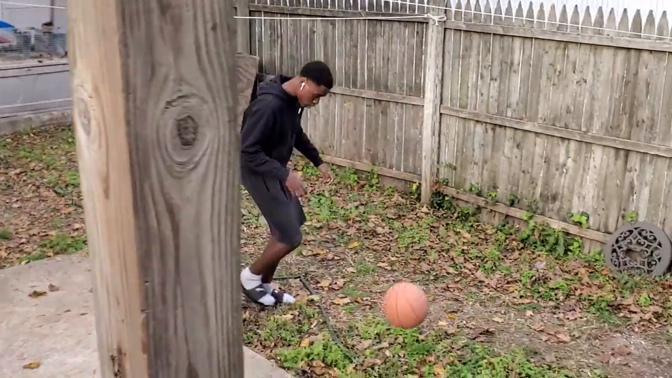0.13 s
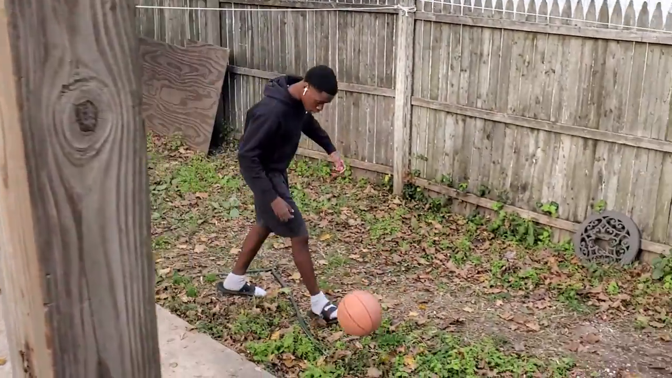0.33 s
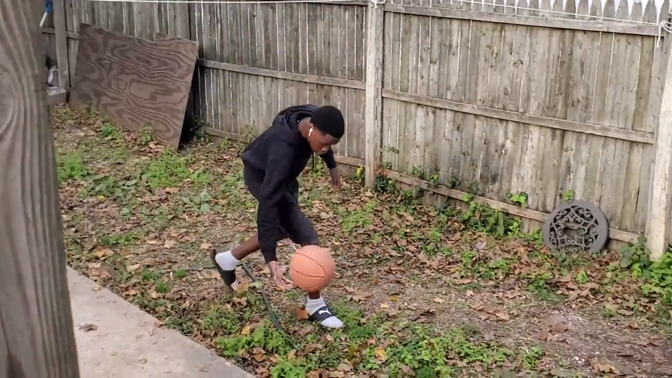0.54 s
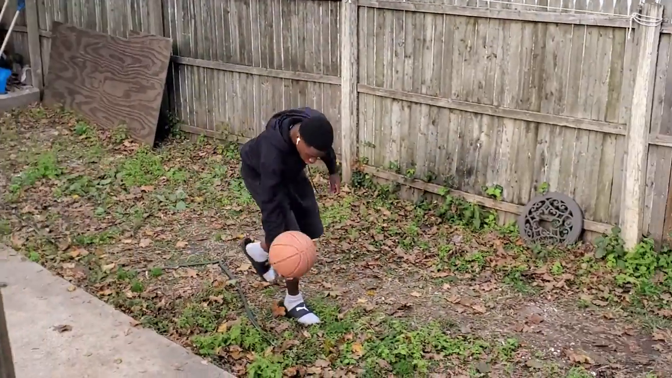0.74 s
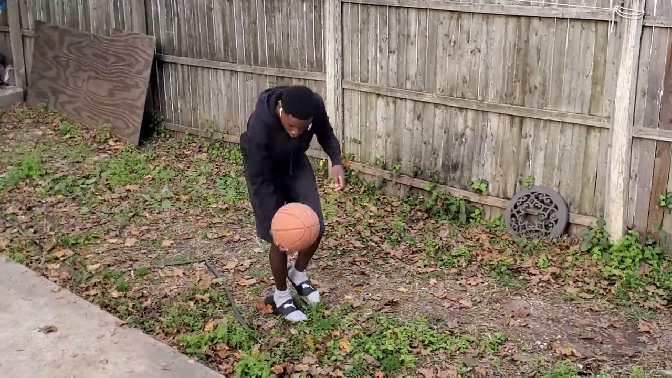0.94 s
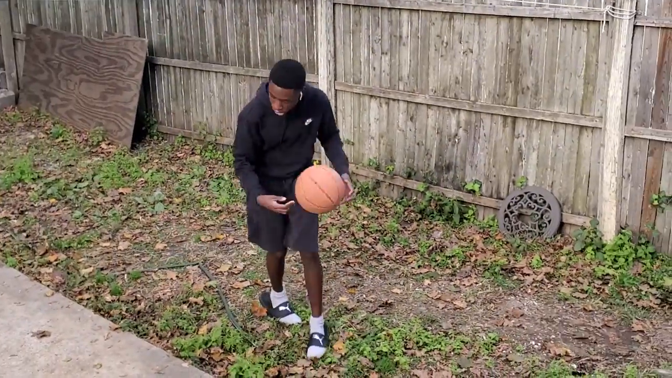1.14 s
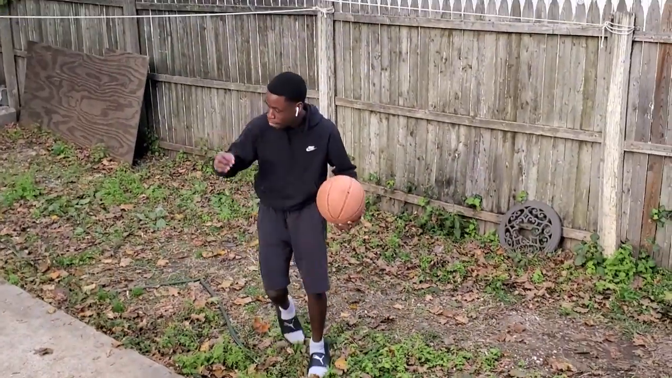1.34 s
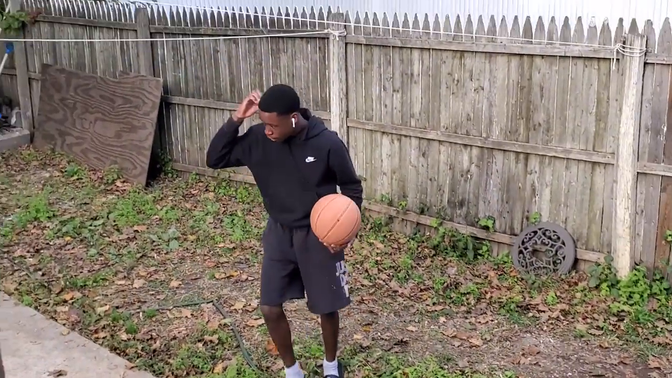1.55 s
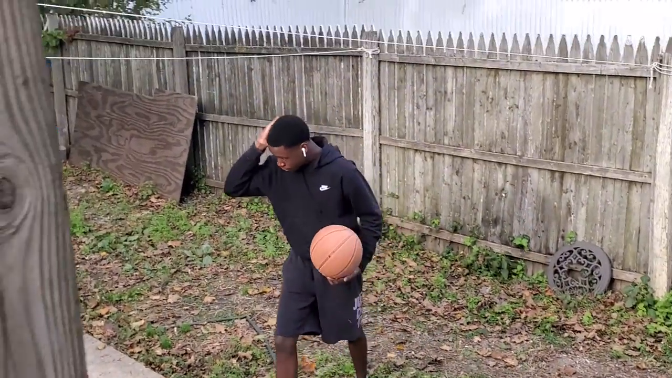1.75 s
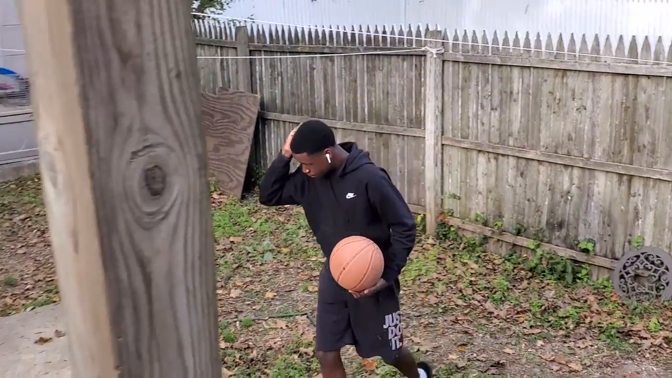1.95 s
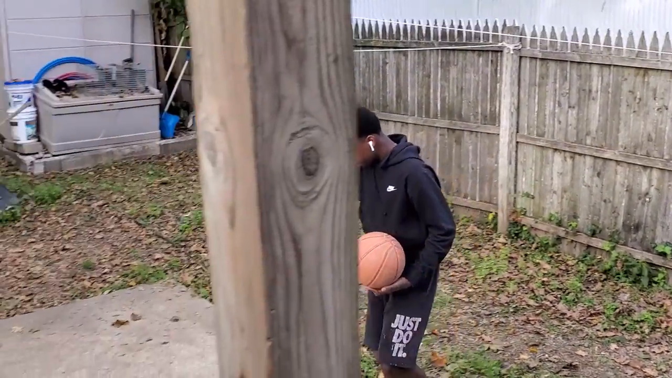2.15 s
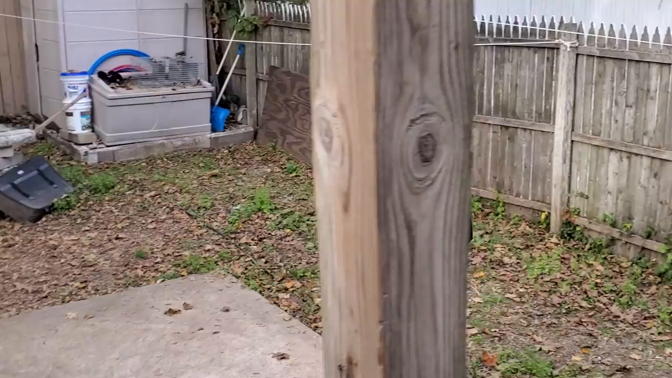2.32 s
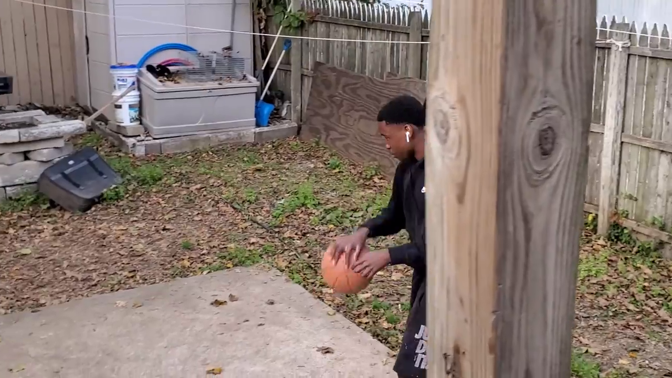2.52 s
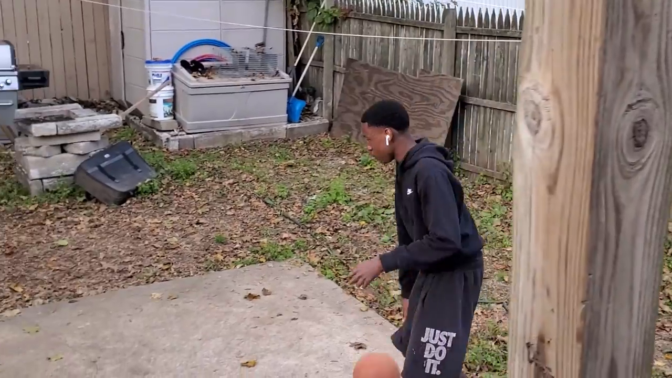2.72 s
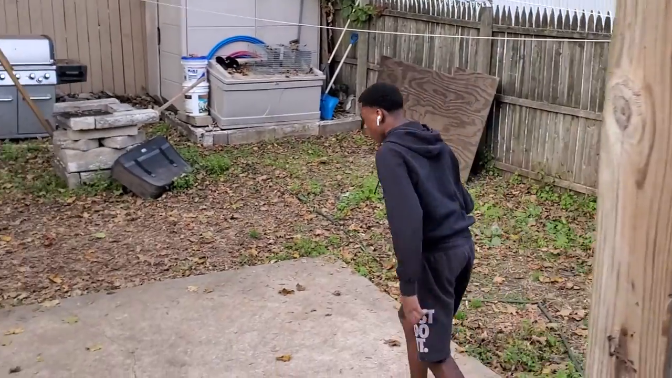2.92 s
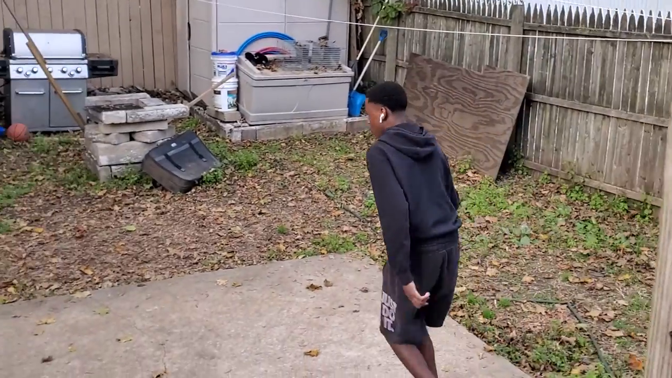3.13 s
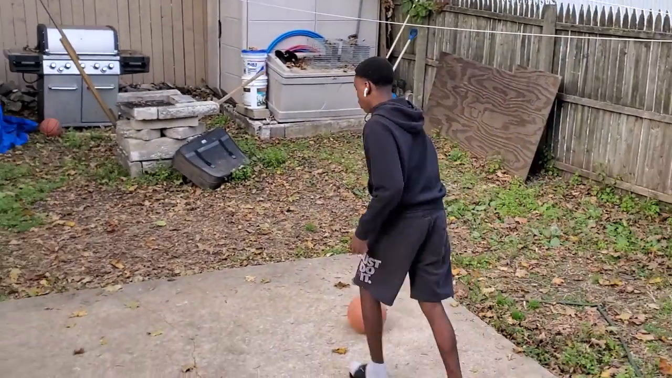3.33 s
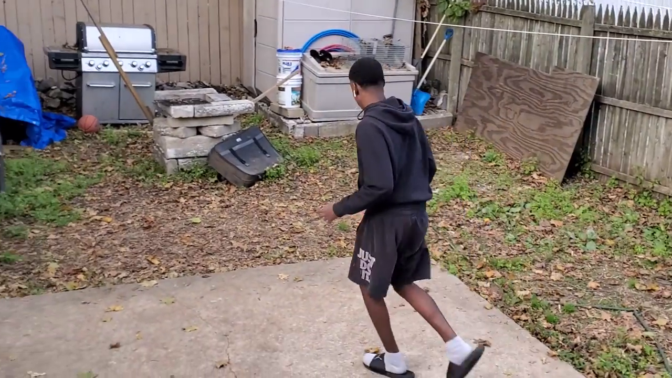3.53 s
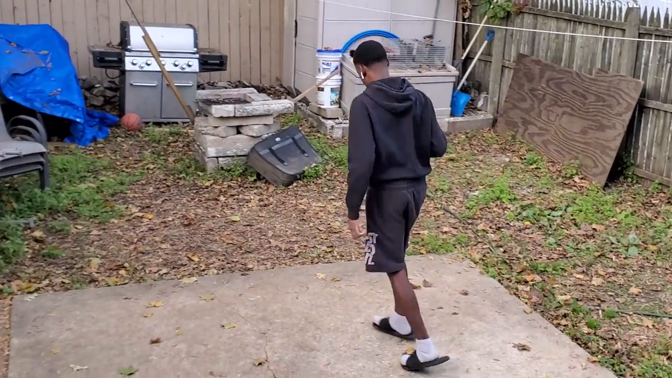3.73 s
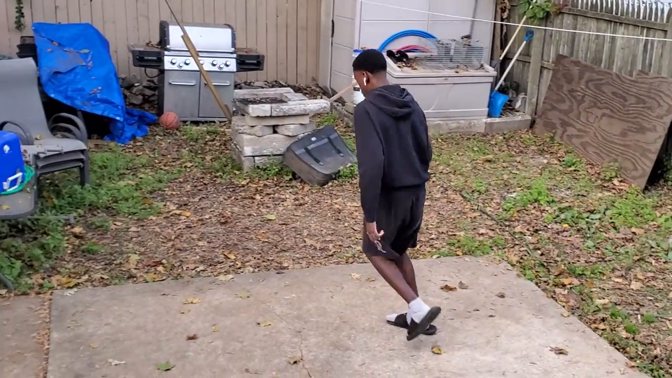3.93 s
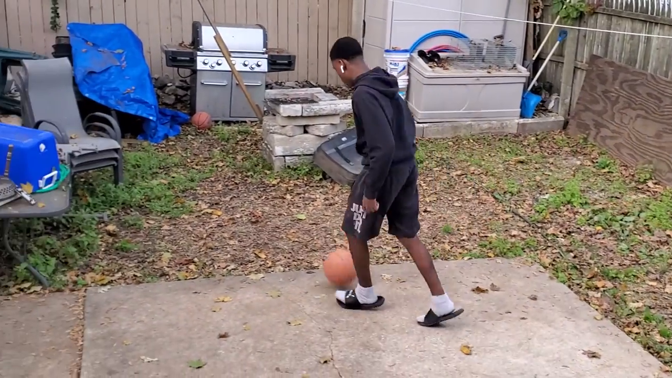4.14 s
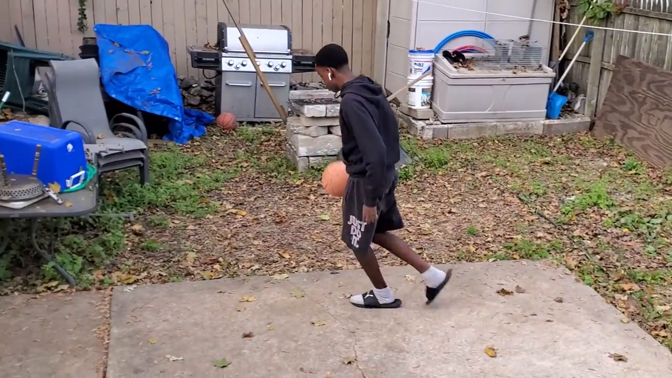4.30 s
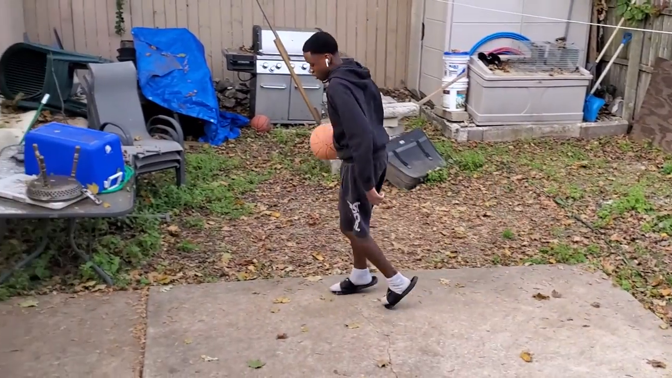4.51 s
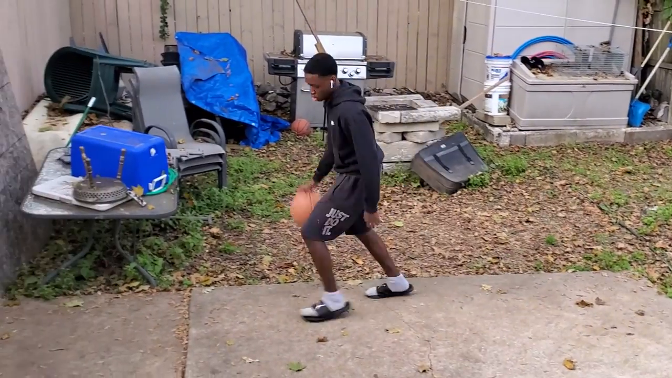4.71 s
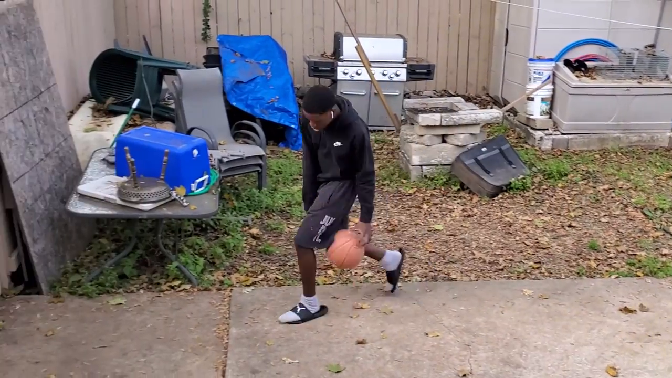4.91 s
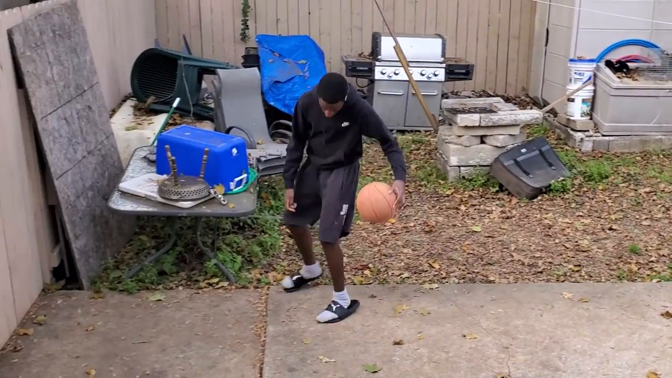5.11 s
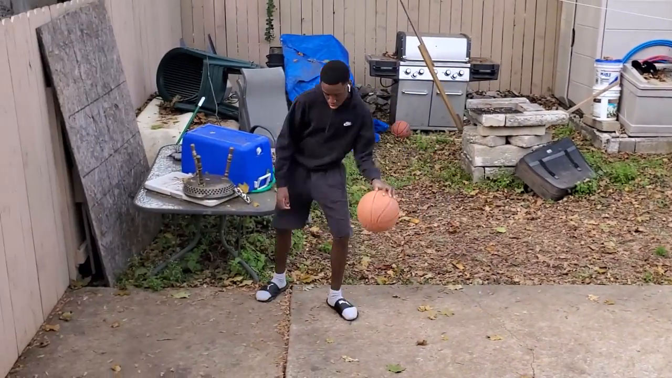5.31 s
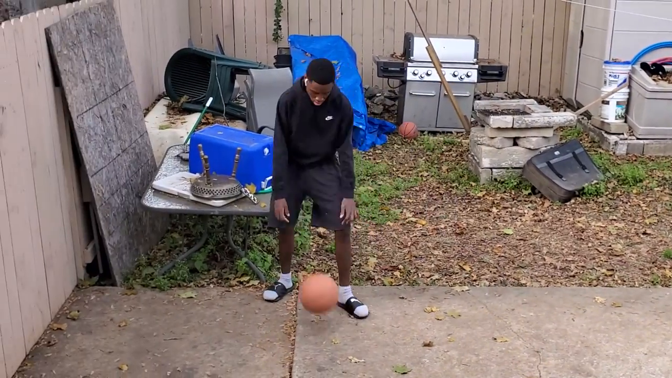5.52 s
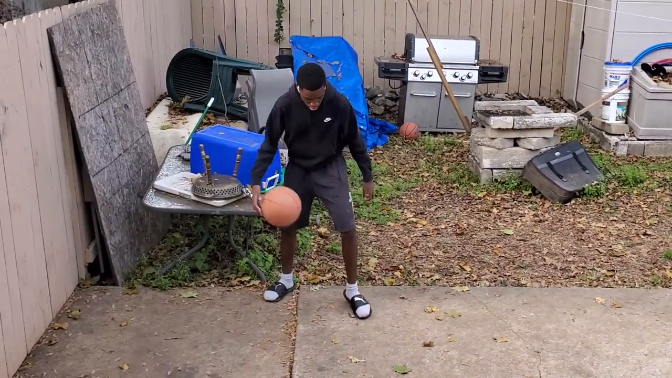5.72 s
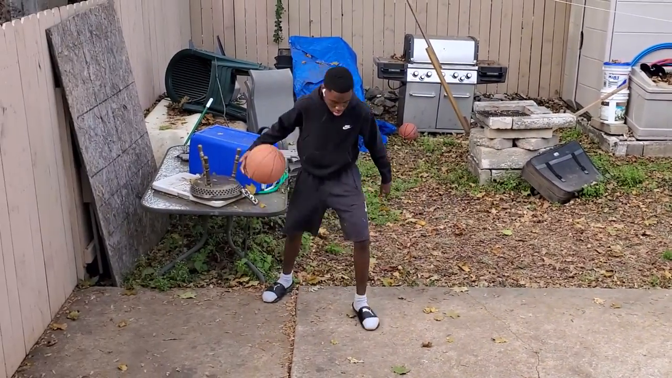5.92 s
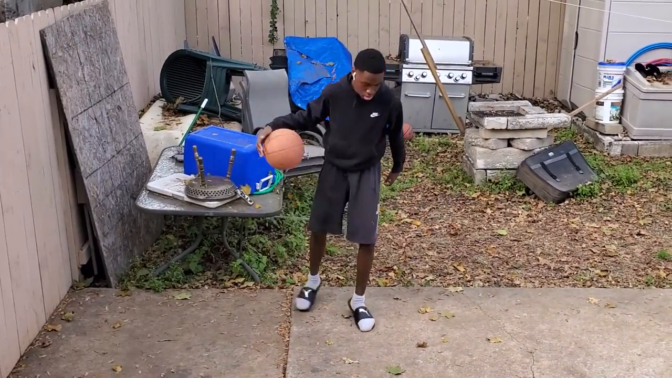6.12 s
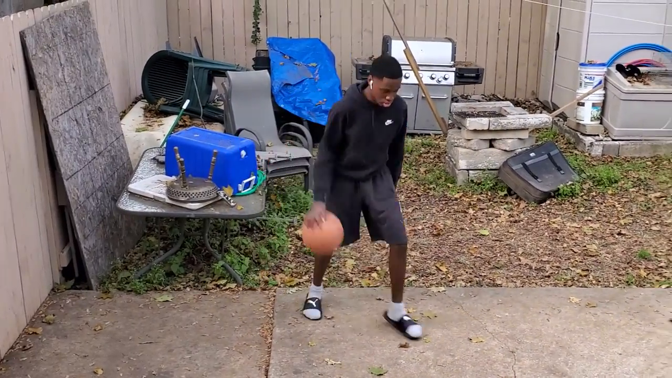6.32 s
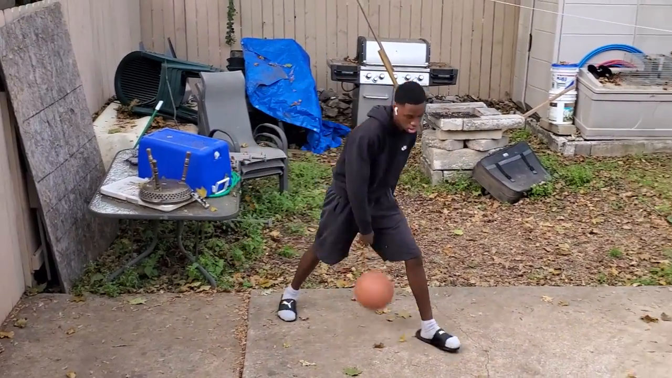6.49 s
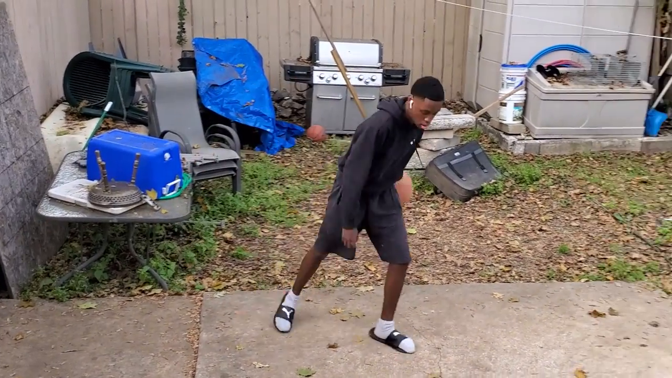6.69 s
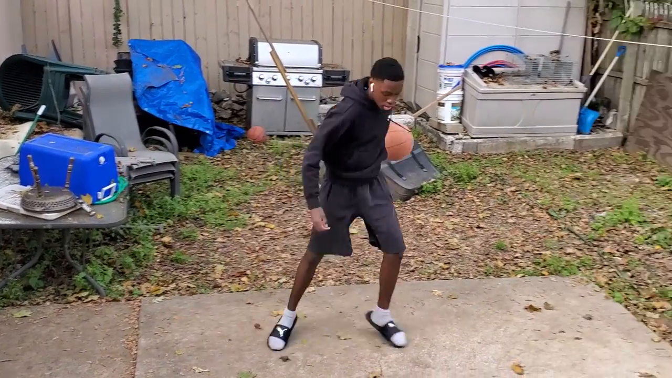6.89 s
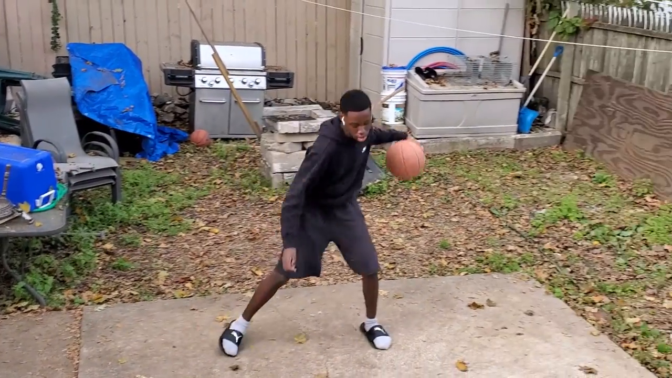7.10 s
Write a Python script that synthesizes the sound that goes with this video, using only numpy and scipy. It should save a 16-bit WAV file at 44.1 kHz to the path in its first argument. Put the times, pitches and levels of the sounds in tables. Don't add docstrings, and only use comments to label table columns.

```python
import sys
import numpy as np
from scipy import signal
from scipy.io import wavfile

SR = 44100
rng = np.random.default_rng(int(sys.argv[2]) if len(sys.argv) > 2 else 0)


def inscribe(sig):
    pcm = np.round(np.clip(np.atleast_2d(sig).T, -1, 1) * 32767)
    wavfile.write(sys.argv[1], SR, pcm.astype(np.int16))


def convert_level_to_amplitude(level_db):
    exponent = np.asarray(level_db, float) / 20
    return 10 ** exponent


N = 315315
TIME = np.arange(N) / SR
PORT_LAG_MS = 0.45
HEARD_S = 0.001
EDGES = 30 * 2 ** np.arange(0, 9.3, 0.5)

# start in seconds, crack peak in dB, push peak in dB,
# air ring relative to the crack in dB, yard tail in dB.
BOUNCES = [
    (0.4189, -28.5, -9, -10.5, -33.5),
    (2.8539, -5, -5.5, -8.5, -20),
    (3.5161, -12.5, -5.5, -4, -19.5),
    (4.2954, -16, -7.5, -0.5, -20.5),
    (4.9727, -9.5, -10, -5.5, -22),
    (5.6685, -18.5, -13, -4, -26),
    (6.6282, -7, -11, -10, -23.5),
]


def at_hz(points, hz):
    point_hz, value = np.array(points).T
    return np.interp(np.log(hz), np.log(point_hz), value)


def drift(rate):
    step = 40
    r = np.exp(-2 * np.pi * step * rate / SR)
    white = rng.standard_normal(N // step + 2002)
    slow = signal.lfilter([1], [1, -2 * r, r * r], white)[2000:]
    return np.interp(np.arange(N) / step, np.arange(len(slow)), slow / np.std(slow))


def ring(clicks, hz, t60):
    r = convert_level_to_amplitude(-60 / (max(t60, 1e-3) * SR))
    w = 2 * np.pi * hz / SR
    return signal.lfilter([0, np.sin(w)], [1, -2 * r * np.cos(w), r * r], clicks + 1e-18)


def strikes(s, size, pan_db, lag_ms):
    out = np.zeros((2, N))
    for side, way in enumerate((0.5, -0.5)):
        at = np.round((s + way * lag_ms / 1000) * SR).astype(int)
        np.add.at(out[side], np.clip(at, 0, N - 1), size * convert_level_to_amplitude(way * pan_db))
    return out


def struck(modes, s, peak_db, pan_db, lag_ms, uneven_db):
    luck = rng.standard_normal((len(s), len(modes)))
    out = 0
    for k, (hz, db, t60) in enumerate(modes):
        size = (-1) ** k * convert_level_to_amplitude(peak_db + db + uneven_db * luck[:, k])
        out = out + ring(strikes(s, size, pan_db, lag_ms), hz, t60)
    return out


def bands(white):
    # frequency in Hz, left-right likeness from 0 to 1.
    likeness = [(60, .99), (130, 1), (290, 0.87), (640, 0.89), (1400, 0.23), (3100, 0.082), (15000, 0.037)]
    # frequency in Hz, left over right in dB.
    side_bias = [(100, -.5), (2000, -1), (4400, -4), (8000, 0), (15000, -2)]
    for k, (low, high) in enumerate(zip(EDGES, EDGES[1:])):
        sos = signal.butter(2, [low, high], "band", fs=SR, output="sos")
        mid, side = signal.sosfilt(sos, white[k % 2])
        hz = min(np.sqrt(low * high), 15200)
        alike = np.clip(at_hz(likeness, hz), -1, 1)
        pair = np.sqrt(1 + alike) * mid + np.sqrt(1 - alike) * side * [[1], [-1]]
        yield hz, pair * convert_level_to_amplitude(at_hz(side_bias, hz) * np.array([[0.5], [-0.5]]))


def density(spectrum, low_hz, high_hz):
    hz = np.linspace(low_hz, high_hz, 400)
    mean_power = np.mean(convert_level_to_amplitude(2 * at_hz(spectrum, hz)))
    return np.sqrt(SR / 4 / (mean_power * (high_hz - low_hz)))


def yard():
    # time in seconds, rumble in dB.
    rumble = [(0.0, -54.5), (0.26, -54), (0.55, -43.5), (1.21, -54.5), (2.69, -52.5), (3.01, -43.5),
              (3.36, -53), (3.62, -50), (4.48, -49.5), (4.8, -45.5), (5.2, -50), (5.85, -49.5),
              (6.13, -44), (6.67, -50.5), (7.15, -45)]
    # frequency in Hz, density in dB per Hz.
    floor_colour = [(15, -35), (25, -13), (48, 8.5), (65, 6), (146, -12), (266, -14.5), (470, -23),
                    (831, -16), (1470, -18), (1780, -29), (2900, -29), (4990, -32), (9330, -35),
                    (15200, -37), (16500, -49)]
    # frequency in Hz, density in dB per Hz.
    tail_colour = [(35, -32), (50, -4.5), (71, 0), (100, -5), (143, -9.5), (200, -13), (285, -20.5),
                   (480, -22.5), (800, -15), (1140, -21), (2300, -30.5), (4600, -33), (9100, -35),
                   (15200, -52.5)]
    # frequency in Hz, t60 in seconds.
    tail_t60 = [(50, 0.43), (130, 0.27), (350, 0.24), (920, 0.29), (2430, 0.39), (6400, 0.26)]
    rumble_db = np.interp(TIME, *np.transpose(rumble))
    hum_db = -58 + 0.13 * (rumble_db - rumble_db.mean())
    air_db = -56
    s, tail_db = np.transpose(BOUNCES)[[0, 4]]
    boom_db = tail_db - 11.5 + 2.5 * np.maximum(s - 2.45, 0)
    blows = strikes(s + 0.0013, convert_level_to_amplitude(2 * tail_db), 0, 0)[0]
    booms = strikes(s + 0.0013, convert_level_to_amplitude(2 * boom_db), 0, 0)[0]
    out, gust = 0, drift(4.5)
    for hz, pair in bands(rng.standard_normal((2, 2, N))):
        fall = convert_level_to_amplitude(-120 / (at_hz(tail_t60, hz) * SR))
        build = np.exp(-1 / ((0.0015 + 1.6 / hz) * SR))
        power = signal.lfilter([1], [1, -fall], (booms if hz < 170 else blows) + 1e-18)
        power = signal.lfilter([(1 - build) ** 2], [1, -2 * build, build ** 2], power)
        tail_gain = convert_level_to_amplitude(at_hz(tail_colour, hz) + 2.8 * drift(25))
        tail = np.sqrt(power) * tail_gain * density(tail_colour, 500, 16000)
        if hz < 110:
            low_hz, high_hz, level_db = 30, 110, rumble_db
        elif hz < 450:
            low_hz, high_hz, level_db = 110, 450, hum_db
        else:
            low_hz, high_hz, level_db = 450, 16000, air_db
        sway_db = 0.27 * gust + (3.2 if hz < 450 else 1.8) * drift(5.6)
        floor = convert_level_to_amplitude(level_db + at_hz(floor_colour, hz) + sway_db) * density(floor_colour, low_hz, high_hz)
        out = out + np.hypot(tail, floor) * pair
    return out


def leaves():
    # start in seconds, peak in dB, low part relative to the peak in dB.
    ticks = [(0.3204, -59.5, 12), (0.7047, -51, -5), (0.7902, -37.5, -13), (0.898, -43, -10),
             (0.9283, -46, -30), (1.057, -46.5, -21), (1.104, -50, -24), (1.1854, -28, -25),
             (1.683, -42.5, -4), (1.82, -39, -27), (2.2708, -43, -14), (2.748, -35.5, -20),
             (2.7543, -36, -16), (3.1204, -29.5, -17), (3.2614, -51, -24), (3.746, -47.5, -8),
             (3.9613, -30, -19), (4.124, -39, -37), (4.13, -40, -35), (4.1846, -46, -37), (4.66, -35, -32),
             (4.929, -29.5, -17), (5.2638, -34, -17), (5.363, -33, -20), (5.8558, -42, -18),
             (5.9213, -44, -18), (6.11, -46, -7), (6.193, -42, -30), (6.769, -52, -11), (6.9216, -22, -27)]
    s, peak_db, low_db = np.transpose(ticks)
    fall, out = convert_level_to_amplitude(-60 / (0.015 * SR)), 0
    for db, low_hz, high_hz in ((peak_db + 0.5, 3800, 16000), (peak_db + low_db + 7.0, 350, 2000)):
        burst = signal.lfilter([1], [1, -fall], strikes(s, convert_level_to_amplitude(db), -1.5, -0.089) + 1e-18)
        sos = signal.butter(2, [low_hz, high_hz], "band", fs=SR, output="sos")
        gain = np.sqrt(SR / 2 / (high_hz - low_hz))
        out = out + gain * signal.sosfilt(sos, burst * rng.standard_normal((2, N)))
    return out


def hums():
    # start in seconds, end in seconds, frequency in Hz, level in dB.
    rubs = [
        (0.118, .30, 1316, -53),
        (0.607, 0.696, 1810, -55.5),
        (0.814, 1.01, 1100, -49),
        (3.838, 3.95, 1800, -62),
        (5.503, 5.68, 1264, -48.5),
        (6.05, 6.19, 1390, -52.5),
        (6.09, 6.17, 2115, -66),
    ]
    out = 0
    for start, end, hz, db in rubs:
        tone = ring(ring(rng.standard_normal(N), hz, 0.03), hz, 0.03)
        tone = tone / np.std(tone[int(start * SR):int(end * SR)])
        swell = np.sin(np.pi * np.clip((TIME - start) / (end - start), 0, 1))
        out = out + convert_level_to_amplitude(db) * tone * swell
    return out


def sole():
    # start in seconds, hiss in dB, fall in dB per second,
    # grit relative to hiss in dB, drag relative to hiss in dB.
    slaps = [(1.183, -46, 215, 4, -5), (1.683, -64.5, 76, 8.5, 4), (2.746, -56.5, 165, 4, -8),
             (3.118, -40.5, 215, 2, -6), (3.431, -36.5, 475, -1, -13.5), (3.961, -37.5, 450, -3, -8),
             (4.123, -62.5, 60, -6, -20), (4.658, -39.5, 260.5, 7.5, -2.5), (5.26, -47.5, 110, 11, -3),
             (6.341, -43, 145, 0.5, 1), (6.572, -48, 100, -4, -16), (6.845, -38, 63, 0.5, -7),
             (7.098, -31, 250, 3.5, -9.5)]
    # centre in seconds, swell in seconds,
    # hiss in dB, grit relative to hiss in dB.
    drags = [(.078, 0.038, -48, 2.5), (.227, 0.09, -55.5, -7.5), (0.399, 0.042, -36.5, -0.5),
             (.5, 0.12, -50, -1), (.6, 0.073, -52, 2.5), (0.658, 0.13, -50, .5), (.82, 0.057, -53.5, -4.5),
             (1.161, .025, -57, 6), (1.32, 0.15, -47, 0), (1.52, 0.029, -54.5, 1.5),
             (1.85, 0.25, -58, -2.5), (2.162, 0.068, -43, -0.5), (2.248, 0.073, -47.5, 0),
             (2.442, 0.069, -34, -2), (2.576, 0.027, -37.5, 2), (2.62, 0.074, -50.5, 0.5),
             (3.372, 0.027, -56, -9), (3.573, 0.055, -40.5, 0.5), (4.05, 0.041, -66, 2.5),
             (4.46, 0.021, -55, -3), (4.881, 0.031, -51.5, -0.5), (4.955, 0.033, -31, 4.5),
             (4.703, 0.038, -43.5, 4.5), (5.384, 0.042, -34, 4), (5.47, 0.045, -54, 4.5),
             (5.66, 0.18, -54.5, 1), (6.15, 0.13, -61, 5.5), (6.616, .03, -40.5, 2),
             (6.75, 0.18, -65.5, 9.5), (7.008, 0.033, -39, -0.5)]
    t = np.arange(0, N + 64, 64) / SR
    shapes = []
    for s, db, fall, grit_db, drag_db in slaps:
        since = t - s - 0.008
        slope = np.where(t < s + 0.008, 1600, -fall)
        shapes.append((db + slope * since, grit_db, drag_db))
    for s, swell, db, grit_db in drags:
        away = np.abs((t - s) / swell / np.where(t > s, 1.254, 1))
        loss_db = 15.5 * away ** 1.53
        shapes.append((db - loss_db, grit_db, -6 + 1.57 * grit_db))
    power = 1e-12
    for db, grit_db, drag_db in shapes:
        power = power + convert_level_to_amplitude(2 * (db + np.array([[0], [grit_db], [drag_db]])))
    return [np.interp(TIME, t, 10 * np.log10(p)) for p in power]


def feet():
    # frequency in Hz, density in dB per Hz.
    scuff_colour = [(400, -16.5), (570, -12), (800, -4.5), (1600, -1.5), (2300, -4.5), (3200, -12),
                    (4600, -7.5), (6500, -11.5), (9100, 2.5), (12900, -0.5), (15200, -15)]
    hiss_db, grit_db, drag_db = sole()
    grain_db = 2.7 * np.minimum(rng.exponential(1, N), 6)
    grains = convert_level_to_amplitude(grain_db + 0.54 * drift(110.0) + 1.48 * drift(18))
    white = rng.standard_normal((2, 2, N)) * grains / np.sqrt(np.mean(grains ** 2))
    out = 0
    for hz, pair in bands(white):
        if hz < 3000:
            low_hz, high_hz, region_db = 600, 3000, drag_db
        elif hz < 8000:
            low_hz, high_hz, region_db = 3000, 8000, grit_db
        else:
            low_hz, high_hz, region_db = 8000, 15500, hiss_db
        level_db = region_db + at_hz(scuff_colour, hz) + 2.8 * drift(22)
        out = out + (hz > 400) * convert_level_to_amplitude(level_db) * density(scuff_colour, low_hz, high_hz) * pair
    return out


def steps():
    # start in seconds, peak in dB, frequency in Hz.
    landings = [
        (0.764, -36, 380),
        (2.55, -33.5, 295),
        (2.57, -38, 71.4),
        (3, -19.5, 65.4),
        (3.958, -35, 540),
        (4.668, -40, 67),
        (7.1, -33, 51.1),
    ]
    out = 0
    for s, db, hz in landings:
        out = out + ring(strikes(np.array([s]), convert_level_to_amplitude(db), -1, -PORT_LAG_MS), hz, 8.4 / hz)
    return out


def ground():
    # frequency in Hz, peak in dB, t60 in seconds.
    notes_of_ground = [
        (456, -27.5, 0.038),
        (1180, -19, .02),
        (749, -27.5, 0.34),
        (903, -21, 0.062),
        (1050, -12.5, 0.039),
        (1324, -16, 0.015),
        (1900, -10, 0.015),
    ]
    out = 0
    for bounce, (hz, db, t60) in zip(BOUNCES, notes_of_ground):
        click = strikes(np.array([bounce[0] + HEARD_S]), convert_level_to_amplitude(db), -0.8, -0.04)
        out = out + ring(click, hz, t60)
    return out


def arrivals():
    # post delay in ms, porch delay in ms,
    # house wall delay in ms, post return in dB, wall return in dB.
    places = [
        (2.6, 13, 20, -13, -30),
        (2.8, 8.1, 18, -5, -8.5),
        (5.5, 19.8, 16.8, 1.5, -13),
        (2.4, 7.5, 21, -8, -25),
        (3.12, 4.8, 25, 3.5, -33),
        (4.9, 6.5, 20.3, -13, -36),
    ]
    # air ring in dB, left over right in dB, left lag in ms.
    surfaces = [
        (-3, 5, -.45),
        (1, 4.5, 0.24),
        (-8, 10, 0.227),
        (-20.5, -1.5, .25),
    ]
    rows = [(0, 2.3 * k, -2 - 0.36 * k, -1.5, 17.5 * (-1) ** k, 0.27 * (-1) ** k) for k in range(1, 8)]
    for k, (post_ms, porch_ms, wall_ms, post_db, wall_db) in enumerate(places):
        paths = (post_ms, post_db), (porch_ms, post_db - 0.5), (wall_ms, wall_db), (37, wall_db - 11.5)
        rows += [(k + 1, *path, *surface) for path, surface in zip(paths, surfaces)]
    return np.transpose(rows)


def push():
    # frequency in Hz, level in dB, t60 in seconds.
    squash = [(75, 4, .056), (185, -6, .06), (245, -7, .05), (385, -13, .045)]
    start_ms = (5.8, 4.8, 4.6, 3.0)
    wall_ms, wall_db = 13.7, -4.5
    s, crack_db, push_db = np.transpose(BOUNCES)[:3]
    luck = rng.standard_normal((len(s), len(squash)))
    hard_db = 0.2 * (crack_db - push_db + 0.5)
    out = 0
    for k, (hz, db, t60) in enumerate(squash):
        size = convert_level_to_amplitude(push_db + db + (k > 0) * (hard_db + 3.7 * luck[:, k]))
        at = np.r_[s, s + wall_ms / 1000] + start_ms[k] / 1000
        clicks = strikes(at, np.r_[size, size * convert_level_to_amplitude(wall_db)], -0.8, -PORT_LAG_MS)
        soft = signal.lfilter([0.0036], [1, -1.88, 0.8836], clicks)
        out = out + ring(soft, hz, t60)
    return out


def ball():
    # frequency in Hz, level in dB, t60 in seconds.
    crack = [(3180, 1, 0.0019), (4830, 10, 0.0018), (5860, 5, 0.0032), (8530, 11, 0.00076),
             (10380, 9, 0.002), (14500, -15, 0.0037)]
    # frequency in Hz, level in dB, t60 in seconds.
    ball_air = [(690, -16, 0.033), (799.5, -2, 0.04), (832, 5.5, 0.023), (894, -4, 0.062),
                (1125, -8.5, 0.03), (1233, -1.5, 0.071), (1251, 11, 0.026), (1634, -11.5, 0.07),
                (1737, 4, 0.012), (2278, 0.5, 0.023), (2330, 1, 0.0096), (2600, 4, 0.014),
                (3090, -37, 0.0067)]
    s, crack_db, _, air_db, _ = np.transpose(BOUNCES)
    which, delay_ms, back_db, back_air_db, pan_db, lag_ms = arrivals()
    which = np.round(which).astype(int)
    when = HEARD_S + np.r_[s, s[which] + delay_ms / 1000]
    pan_db, lag_ms = np.r_[0 * s - 2.5, pan_db], np.r_[0 * s + 0.05, lag_ms]
    all_crack_db = np.r_[crack_db, crack_db[which] + back_db] - 1.5
    ring_db = crack_db + air_db - 6.0
    all_ring_db = np.r_[ring_db, ring_db[which] + back_air_db]
    out = struck(crack, when, all_crack_db, pan_db, lag_ms, uneven_db=2.5)
    out += struck(ball_air, when, all_ring_db, pan_db, lag_ms, uneven_db=3)
    return out + push()


def scene():
    diffuse = yard() + feet() + hums()
    diffuse[1] = np.roll(diffuse[1], round(PORT_LAG_MS * SR / 1000))
    return diffuse + leaves() + steps() + ground() + ball()


def peak(x, hz, width_hz, db):
    w, g = 2 * np.pi * hz / SR, convert_level_to_amplitude(db / 2)
    a = np.sin(w) * width_hz / (2 * hz)
    middle = -2 * np.cos(w)
    return signal.lfilter([1 + a * g, middle, 1 - a * g], [1 + a / g, middle, 1 - a / g], x)


def band_limit(x):
    return signal.sosfilt(signal.butter(12, 16960, fs=SR, output="sos"), x)


def record(dry):
    # frequency in Hz, width in Hz, lift in dB.
    port = [(480, 76, -5), (2040, 400, 2), (2570, 143, -2.5), (4840, 2360, 3), (9340, 2980, -8),
            (15070, 5800, 7)]
    x = signal.sosfilt(signal.butter(2, 38, "high", fs=SR, output="sos"), dry)
    for hz, width_hz, db in port:
        x = peak(x, hz, width_hz, db)
    x = x / (1 + (x / 0.88) ** 4) ** 0.25
    x = signal.sosfilt(signal.cheby2(12, 60, 16900, fs=SR, output="sos"), x)
    return band_limit(x)


dry = scene()
out = record(dry)
inscribe(out)
```